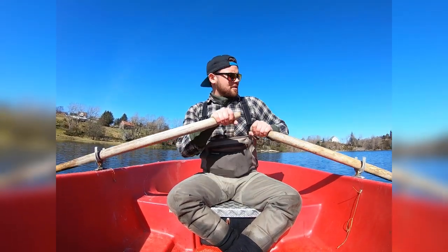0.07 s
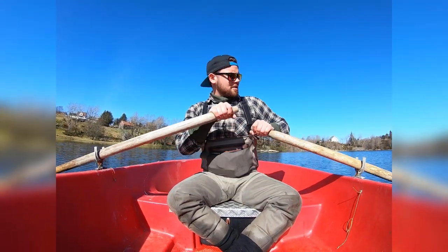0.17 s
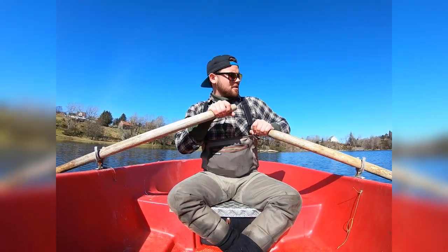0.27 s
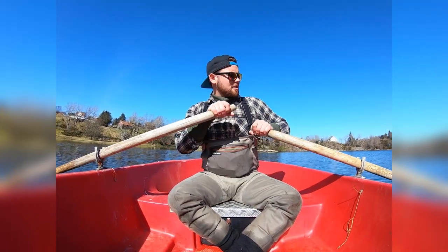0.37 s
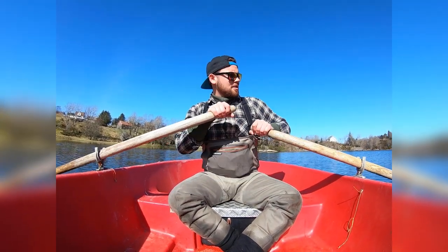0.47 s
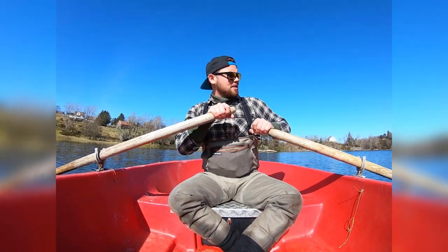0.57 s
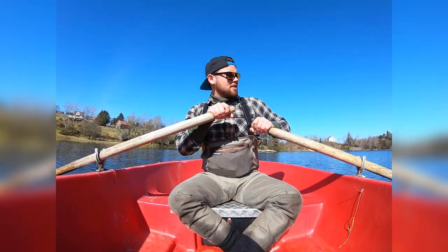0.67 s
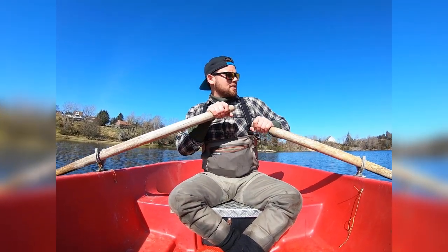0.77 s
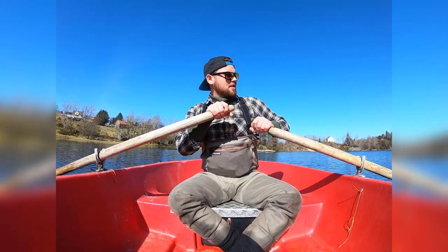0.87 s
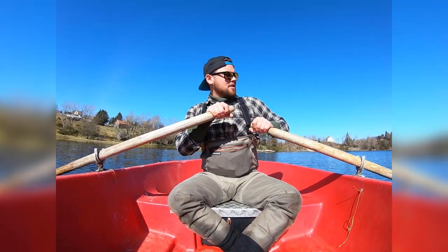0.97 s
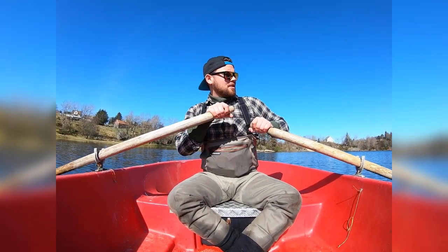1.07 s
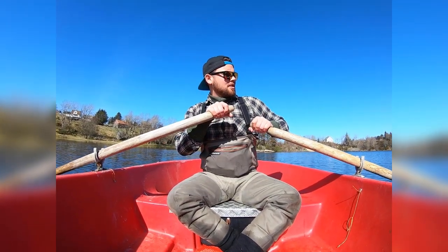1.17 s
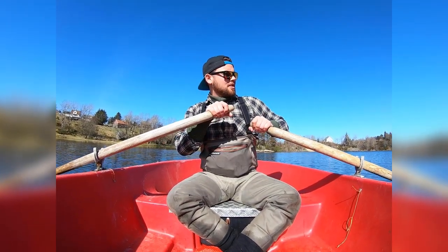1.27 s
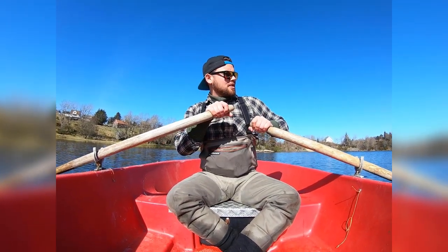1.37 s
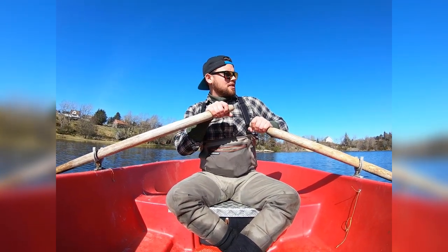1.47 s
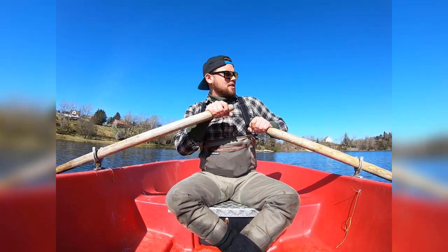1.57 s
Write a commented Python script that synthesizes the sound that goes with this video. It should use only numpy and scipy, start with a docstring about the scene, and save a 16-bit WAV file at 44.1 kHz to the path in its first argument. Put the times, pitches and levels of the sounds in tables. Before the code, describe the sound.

Rowing oars catch the water with bright plops, droplets and a booming gulp against the hull; water churns left and right, gurgles and gradually settles. Close stereo microphone in an open boat, with short hull reflections.

```python
"""Oar stroke heard inside a rowboat

One stroke of a small plastic rowboat on a lake: a splash of plops and drops, then deep gulps that boom.
Water swirls and drips on either side and settles, over a low rumble of water and air on the boat.
Swarms of short tones and coloured noise make the water; single tones make plops, drops, bubbles and gulps."""
import sys
import numpy as np
from scipy import signal
from scipy.fft import rfft, irfft, next_fast_len
from scipy.io import wavfile
from scipy.ndimage import map_coordinates

SR = 44100
rng = np.random.default_rng(int(sys.argv[2]) if len(sys.argv) > 2 else 0)


def master(y):
    """Save y as 16-bit WAV."""
    cut = np.clip(np.atleast_2d(y).T, -1, 1)
    pcm = np.round(cut * 32767)  # scale
    wavfile.write(sys.argv[1], SR, pcm.astype(np.int16))


N = 72765

HULL_ECHO_DB, HULL_T60_S = -3, 0.069
PORT_LAG_MS = 0.063


def amp(db):
    """Decibels to gain."""
    return 10 ** (np.asarray(db) / 20)


def unit(x):
    """Scale to rms 1."""
    return x / np.sqrt(np.mean(x ** 2) + 1e-20)


def curves(rows):
    """One value per sample for each column after the time."""
    times_s, *columns = np.transpose(rows)
    return [np.interp(np.arange(N) / SR, times_s, column) for column in columns]


def filtered(x, response):
    """x times a response of frequency."""
    size = next_fast_len(N + 8192)
    spectrum = rfft(x, size) * response(np.fft.rfftfreq(size, 1 / SR))
    return irfft(spectrum, size)[..., :N]


def coloured(x, points):
    """x filtered by (Hz, dB) points joined over log frequency, at rms 1."""
    points_hz, points_db = np.transpose(points)

    def response(hz):
        return amp(np.interp(np.log(hz + 1), np.log(points_hz), points_db, right=-120))

    return unit(filtered(x, response))


def lagged(x, lag_ms):
    """x arriving later, by a phase slope."""
    return filtered(x, lambda hz: np.exp(-2j * np.pi * hz * lag_ms / 1000))


def sides(pan_db):
    """Left and right gains for a left-minus-right level; the nearer side has gain 1."""
    return amp(np.array([np.minimum(pan_db, 0), np.minimum(-pan_db, 0)])).reshape(2, -1)


def noise(alike):
    """Stereo white noise with a given correlation between the sides."""
    turn = np.arccos(np.clip(alike, -1, 1)) / 2
    a, b = rng.standard_normal((2, N))
    mid, side = np.cos(turn) * a, np.sin(turn) * b
    return np.array([mid + side, mid - side])


def swell(t_s, rise_ms, decay_ms):
    """An envelope that rises to 1 at t = 0 and then dies away exponentially."""
    rising = np.abs(t_s / rise_ms * 1000) ** 1.5
    falling = t_s / decay_ms * 1000
    return np.exp(-np.where(t_s < 0, rising, falling))


def ping(peak_s, hz, rise_ms, decay_ms, glide_per_s=0):
    """A bubble tone, hz at its peak, gliding linearly in pitch."""
    t_s = np.arange(N) / SR - peak_s
    turns = hz * t_s * (1 + glide_per_s * t_s / 2)
    return swell(t_s, rise_ms, decay_ms) * np.cos(2 * np.pi * turns)


def hull_echo(x):
    """Short scatter of mono x off the boat's walls: decaying noise, different on each side."""
    t_s = np.arange(SR // 8) / SR
    tail = rng.standard_normal((2, len(t_s))) * amp(-60 * t_s / HULL_T60_S) * (t_s > .002)
    tail = tail / np.linalg.norm(tail[0])
    return amp(HULL_ECHO_DB) * signal.fftconvolve(x[None], tail, axes=1)[:, :N]


def swarm(rate, low_hz, high_hz, cycles, spread_db, width_db):
    """Many decaying bubble tones (rate per s); random direction sets level and phase at each side."""
    count = int(rate * N / SR)
    when, pitch, size, where, life, phase = rng.random((count, 6)).T[:, :, None]
    hz = low_hz * (high_hz / low_hz) ** pitch
    k = np.arange(min(int(4.5 * SR * cycles / low_hz), 2400))
    turns = hz * k / SR
    age = turns / (cycles * (.5 + life))
    shape = np.exp(-age) * (1 - np.exp(-turns))
    shape = shape * amp(-spread_db * size) * np.sqrt(hz / high_hz)
    pan_db = width_db * (2 * where - 1)
    at = ((when * N).astype(int) + k).ravel()
    pair = []
    for gain, way in zip(sides(pan_db[:, 0]), (1, -1)):
        tones = gain[:, None] * shape * np.sin(2 * np.pi * (turns + phase) + way * pan_db / 10)
        pair.append(np.bincount(at, tones.ravel(), N)[:N])
    pair = np.array(pair)
    return unit(pair + hull_echo(pair.mean(axis=0)))


# Rumble on the hull. Each row: time in seconds, level in dB before trim.
RUMBLE_LEVEL = [(0, -56.5), (.08, -39), (.18, -47.5), (.22, -27), (.41, -38), (.50, -54.5), (.61, -63),
                (.68, -49.5), (.82, -48), (.97, -56.5), (1.28, -60), (1.65, -60.5)]
# Spectra of boom and heave. Each row: frequency in Hz, relative density in dB per Hz.
BOOM_COLOUR = [(35, -19.5), (75, -0.5), (105, -6), (130, -2.5), (155, -10), (195, -3), (250, -21),
               (500, -28.5)]
HEAVE_SPECTRUM = [(15, 3.5), (42, 4), (65, 1), (110, -33)]
BOOM_TRIM_DB, HEAVE_TRIM_DB, HEAVE_MAX_DB = -3, 3.5, -48


def rumble():
    """Water pushes on the hull, which booms; the slow heave underneath grows only up to a limit."""
    level_db, = curves(RUMBLE_LEVEL)
    boom = amp(level_db + BOOM_TRIM_DB) * coloured(noise(alike=0.58), BOOM_COLOUR)
    heave_db = np.minimum(level_db + HEAVE_TRIM_DB, HEAVE_MAX_DB)
    return boom + amp(heave_db) * coloured(noise(alike=0.17), HEAVE_SPECTRUM)


# Low gurgle behind the blades. Each row: time in seconds, level in dB before trim.
GURGLE_LEVEL = [(0, -70), (.155, -75), (.20, -50.5), (.46, -60), (.61, -57.5), (.71, -55), (.85, -50),
                (.97, -59), (1.07, -55.5), (1.28, -59.5), (1.56, -63), (1.61, -59)]
# Gurgle spectrum. Each row: frequency in Hz, relative density in dB per Hz.
GURGLE_SPECTRUM = [(120, 3.5), (270, -7), (380, -4), (480, -5), (620, 3), (850, -2), (1400, 1.5)]
GURGLE_TRIM_DB = 2.5


def gurgle():
    """Slow, large bubbles in the eddies: low tones mixed with noise."""
    level_db, = curves(GURGLE_LEVEL)
    bubbles = swarm(rate=900, low_hz=277.5, high_hz=1039, cycles=2.64, spread_db=9.5, width_db=10.5)
    eddies = bubbles + noise(alike=0.1)
    return amp(level_db + GURGLE_TRIM_DB) * coloured(eddies, GURGLE_SPECTRUM)


# Fine spray. Each row: time in seconds, level in dB before trim.
SPRAY_LEVEL = [(0, -65), (.062, -55.5), (.10, -68.5), (.155, -74), (.195, -47.5), (.235, -57.5),
               (.44, -53.5), (.56, -66), (.67, -65), (.84, -70), (1.2, -71), (1.65, -75)]
# Spray spectrum. Each row: frequency in Hz, relative density in dB per Hz.
SPRAY_SPECTRUM = [(1500, -30), (3200, -5), (5000, -9.5), (8200, -7.5), (10000, -18), (12500, -27),
                  (15000, -36)]
SPRAY_TRIM_DB = 4.5


def spray():
    """Fine droplets crackle, mostly off the right-hand blade: brief high tones mixed with noise."""
    level_db, = curves(SPRAY_LEVEL)
    droplets = swarm(rate=1200, low_hz=3174, high_hz=10270, cycles=2.4, spread_db=49, width_db=6)
    mist = droplets + amp(-1.5) * noise(alike=0.5)
    left, right = coloured(mist, SPRAY_SPECTRUM)
    pair = np.array([lagged(left, PORT_LAG_MS), right])
    return amp(level_db + SPRAY_TRIM_DB) * unit(sides(pan_db=-3.5)) * pair


# Water stirred by the blades. Each row: time in seconds, level in dB before trim,
# left minus right in dB before halving.
CHURN_LEVEL_PAN = [(0.0, -72, -26), (0.07, -66.5, -3), (0.125, -77.5, 1), (0.16, -65, -20),
                   (0.18, -50, -31), (0.275, -43, 7), (0.312, -55, 0), (0.42, -47.5, -17),
                   (0.62, -54.5, 12.5), (0.702, -52, -8), (1.12, -59, -11), (1.18, -60.5, 3),
                   (1.488, -63.5, -3.5), (1.566, -65, 6), (1.65, -65, -2)]
# Churn spectrum. Each row: frequency in Hz, relative density in dB per Hz.
CHURN_SPECTRUM = [(400, -8.5), (800, -14.5), (1200, -3.5), (1700, 0), (2600, -6), (3600, -13.5),
                  (5000, -26), (9000, -46)]
CHURN_TRIM_DB = 6
RUSH_DB, RUSH_DB_PER_CHURN_DB = -1.5, 0.37  # rush against bubbles, at the mean churn level


def churn():
    """Bubbling water round the two blades, side to side; stirred hard, it blends into a noisy rush."""
    level_db, pan_db = curves(CHURN_LEVEL_PAN)
    bubbles = swarm(rate=3000, low_hz=800, high_hz=5000, cycles=5.5, spread_db=26, width_db=22)
    rush = amp(RUSH_DB + RUSH_DB_PER_CHURN_DB * (level_db - level_db.mean()))
    water = (bubbles + rush * noise(alike=0)) / np.sqrt(1 + rush ** 2)
    return amp(level_db + CHURN_TRIM_DB) * unit(sides(.5 * pan_db)) * coloured(water, CHURN_SPECTRUM)


# Small slaps of water. Each row: peak in seconds, envelope level in dB, decay in ms.
SLAP_EVENTS = [(.052, -48, 14), (.268, -37, 10), (0.663, -48, 6), (0.739, -48.5, 8.1), (0.983, -48.5, 11.5),
               (1.074, -47.5, 4.6), (1.152, -52.5, 8), (1.196, -53.5, 14), (1.448, -57.5, 8.4),
               (1.302, -50.5, 2.5), (1.564, -53, 3.8), (1.608, -58, 6)]
# Slap spectrum. Each row: frequency in Hz, relative density in dB per Hz.
SLAP_SPECTRUM = [(900, -17), (2000, -1.5), (3400, 2), (5000, -8.5), (8300, -15), (11000, -28)]
SLAP_RISE_MS, SLAP_PAN_DB = 3.6, -1.5


def slaps():
    """Each slap sends up a quick cluster of tiny bubbles and drops: an enveloped swarm."""
    t_s = np.arange(N) / SR
    shape = sum(amp(db) * swell(t_s - peak_s, SLAP_RISE_MS, decay_ms)
                for peak_s, db, decay_ms in SLAP_EVENTS)
    fizz = swarm(rate=4300, low_hz=1495, high_hz=9580, cycles=2.7, spread_db=33, width_db=29)
    return shape * sides(SLAP_PAN_DB) * coloured(fizz, SLAP_SPECTRUM)


WAVER_DEPTH, WAVER_PER_S = .3, 130


def waver():
    """A gain that flutters as a bubble wobbles under the surface: smoothed random knots."""
    knots = rng.standard_normal(int(N * WAVER_PER_S / SR) + 4)
    flutter = map_coordinates(knots, [np.arange(N) * WAVER_PER_S / SR])
    return np.exp(WAVER_DEPTH * (flutter - WAVER_DEPTH))


# Larger bubbles. Each row: peak in seconds, pitch at peak in Hz, level in dB before waver,
# left minus right in dB, rise in ms, decay in ms, relative glide per second.
BUBBLE_EVENTS = [(.641, 385, -46, 0, 6, 10, -4), (.662, 240, -43, 0, 6, 18, -2),
                 (.805, 378, -49, -2, 12, 22, 1), (.883, 425, -45, -3, 26, 11, 5),
                 (.999, 584, -37, -4, 3, 26, -1.5), (1.004, 1700, -42, -14, 6, 13, 15),
                 (1.107, 2080, -51, -4, 6, 13, -7), (1.155, 1320, -50, -2, 8, 12, 1),
                 (1.482, 905, -47, -2, 21, 16, 8)]
BUBBLE_ECHO_DB = -10  # on top of HULL_ECHO_DB


def singing_bubbles():
    """Larger bubbles ring on with a wavering tone that glides up or down."""
    tones = sum(sides(pan_db) * amp(db) * ping(peak_s, hz, rise_ms, decay_ms, glide_per_s)
                for peak_s, hz, db, pan_db, rise_ms, decay_ms, glide_per_s in BUBBLE_EVENTS)
    pair = waver() * tones
    return pair + amp(BUBBLE_ECHO_DB) * hull_echo(pair.mean(axis=0))


# Droplets hitting the surface. Each row: peak in seconds, level in dB, pitch in Hz,
# left minus right in dB.
DROP_EVENTS = [(.160, -44, 6800, -25), (0.202, -36, 4600, -20), (0.362, -33.5, 6400, -22),
               (0.429, -33, 7900, -30.5), (.706, -36.5, 7750, -15), (0.776, -36, 7040, -19),
               (0.835, -35, 6440, -30), (.992, -37, 6300, -23)]
DROP_RISE_MS, DROP_DECAY_MS = 0.17, 0.22


def drops():
    """Single droplets: very short high tones, later on the left, scattered by the boat."""
    left, right = sum(sides(pan_db) * amp(db) * ping(peak_s, hz, DROP_RISE_MS, DROP_DECAY_MS)
                      for peak_s, db, hz, pan_db in DROP_EVENTS)
    direct = np.array([lagged(left, PORT_LAG_MS), right])
    return direct + hull_echo((left + right) / 2)


# Closing air pockets. Each row: peak in seconds, pitch in Hz, level in dB before trim,
# left minus right in dB, decay in ms.
PLOP_EVENTS = [(.0755, 2070, -25.5, -20, 0.8), (.108, 2350, -37, 8, 0.66), (0.1722, 1601, -20.5, -18, 2.3),
               (0.1846, 2320, -24, -19, 0.38), (.2558, 2410, -18, 13, 0.6), (.330, 2760, -23, 9.5, 1.46),
               (0.3388, 1600, -19, 22, 0.4), (0.3413, 1486, -25.5, -29, 7), (0.371, 2100, -29, -4, 0.94),
               (0.4106, 1870, -23, -26, 1.05), (0.444, 1330, -31.5, -24, 2.5),
               (0.497, 1230, -28.5, -16, 3.5), (0.6382, 1860, -22.5, 10, 1.14), (.659, 1710, -41, -22, 1.8),
               (.712, 700, -29.5, -11, 3), (.728, 1230, -15, -14.5, 0.78), (1.063, 500, -33.5, -2.5, 1.4),
               (1.306, 2020, -29, -17, 1.4), (1.37, 2075, -41, 5, 3.2), (1.4316, 1530, -27.5, -25, 0.65),
               (1.564, 1490, -38, 8, 2.5), (1.593, 537, -38.5, -3, 1.3)]
PLOP_RISE_MS, PLOP_TRIM_DB = .7, -3


def plops():
    """Closing air pockets: short tones, each scattered by the boat with half its pan."""
    pair = np.zeros((2, N))
    for peak_s, hz, db, pan_db, decay_ms in PLOP_EVENTS:
        plop = amp(db + PLOP_TRIM_DB) * ping(peak_s, hz, PLOP_RISE_MS, decay_ms)
        pair += sides(pan_db) * plop + sides(pan_db / 2) * hull_echo(plop)
    return pair


# Deep gulps. Each row: peak in seconds, pitch in Hz, level in dB, rise in ms, decay in ms.
GULP_EVENTS = [(.208, 187, -24.5, 6.8, 13), (0.232, 99, -28, 3.2, 14), (0.255, 194.3, -14.5, 13.3, 11.3),
               (0.291, 203.7, -26, 7.3, 9), (0.263, 132.2, -33.5, 22, 34), (0.361, 77.4, -33.5, 32, 39),
               (0.377, 199, -46, 19, 21), (0.693, 47.4, -36.5, 8.2, 12), (0.74, 190, -41, 25, 22),
               (0.786, 45, -39, 17, 18), (0.973, 50.2, -42, 56, 20), (1.184, 62, -38, 39, 29),
               (1.512, 89, -46.5, 17, 14)]
GULP_PAN_DB = -2


def gulps():
    """Big air pockets boom under the blades, loudest at the catch: low decaying tones."""
    booms = sum(amp(db) * ping(peak_s, hz, rise_ms, decay_ms)
                for peak_s, hz, db, rise_ms, decay_ms in GULP_EVENTS)
    return sides(GULP_PAN_DB) * booms


def scene():
    """All the water sounds round the boat."""
    background = rumble() + gurgle() + spray() + churn()
    return background + slaps() + singing_bubbles() + drops() + plops() + gulps()


TOP_HZ = 15100


def record(dry):
    """Band limit: nothing from TOP_HZ up passes."""
    return filtered(dry, lambda hz: hz < TOP_HZ)


dry = scene()
out = record(dry)
master(out)
```